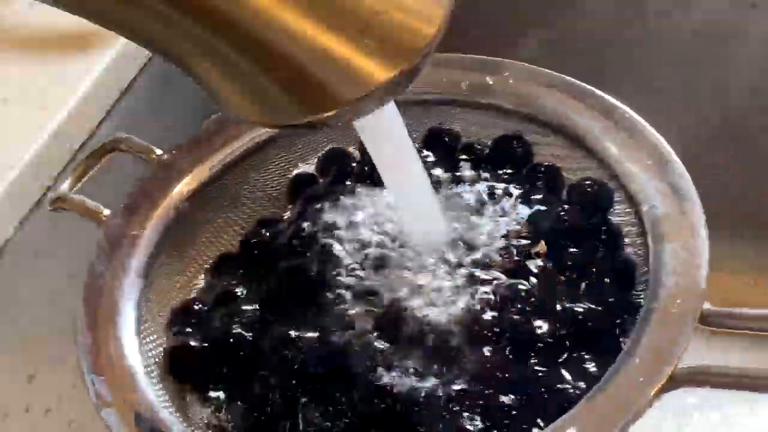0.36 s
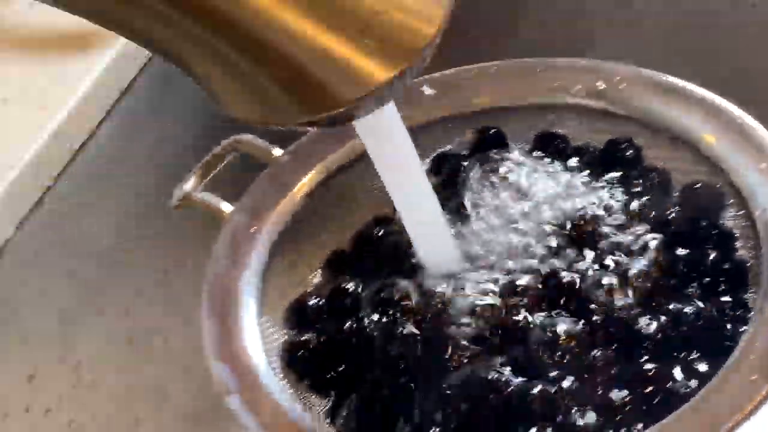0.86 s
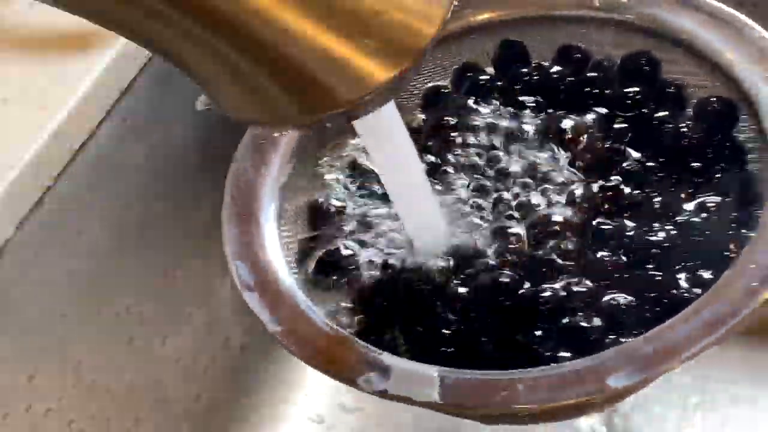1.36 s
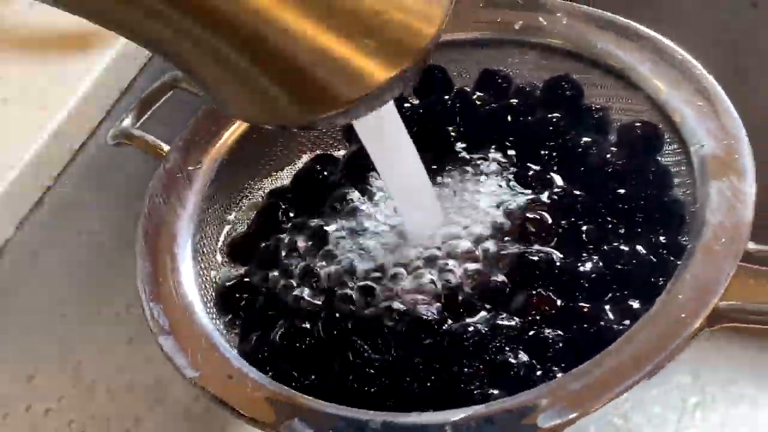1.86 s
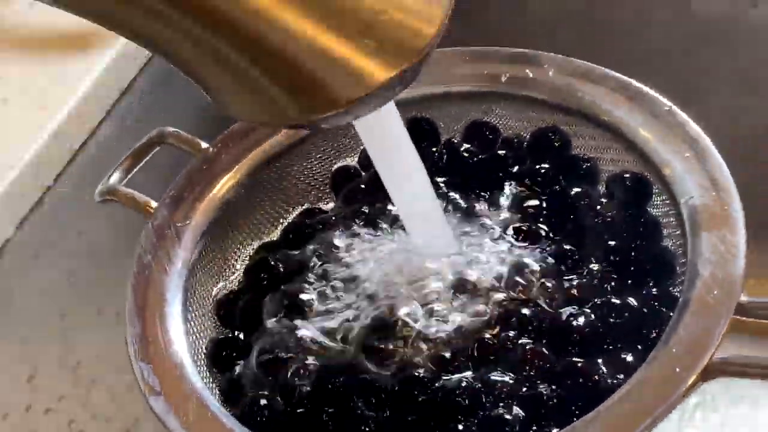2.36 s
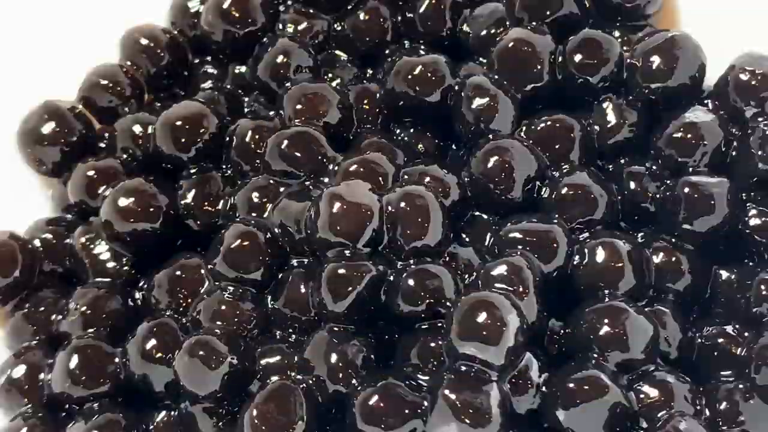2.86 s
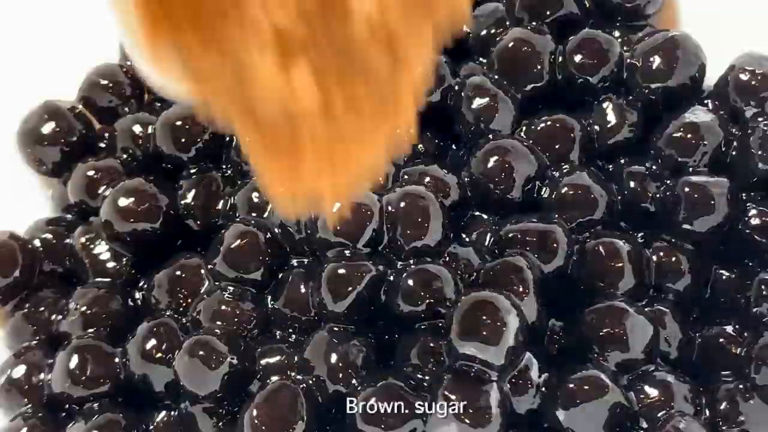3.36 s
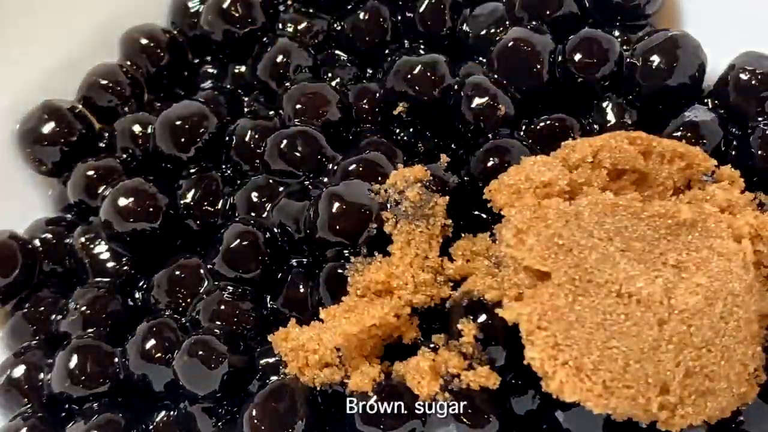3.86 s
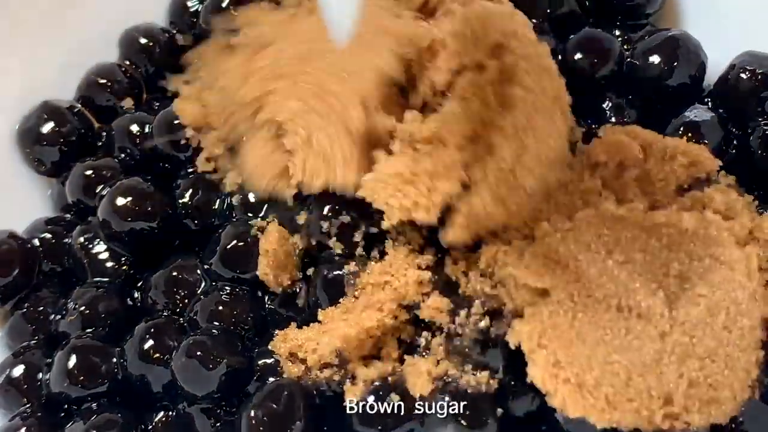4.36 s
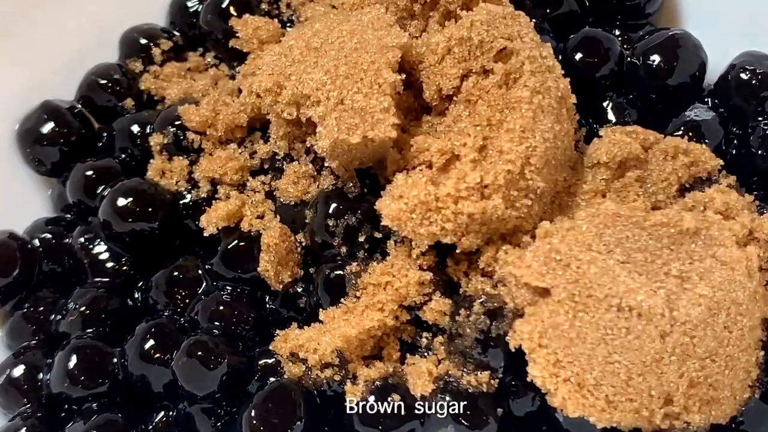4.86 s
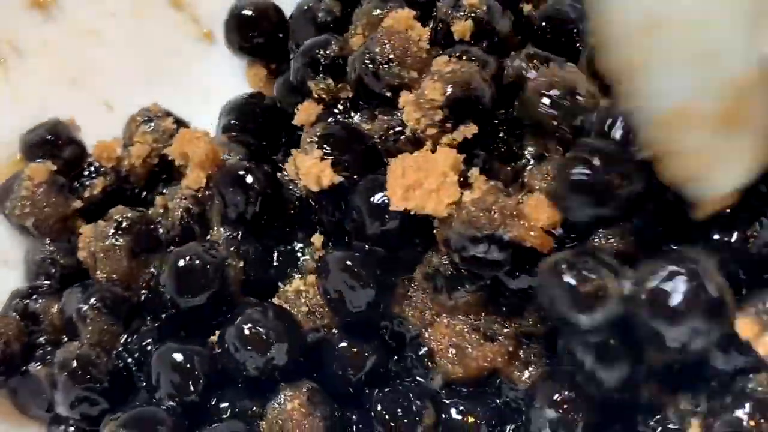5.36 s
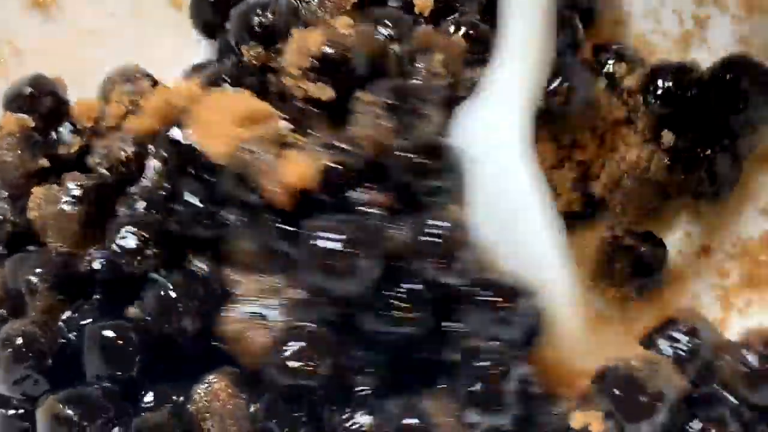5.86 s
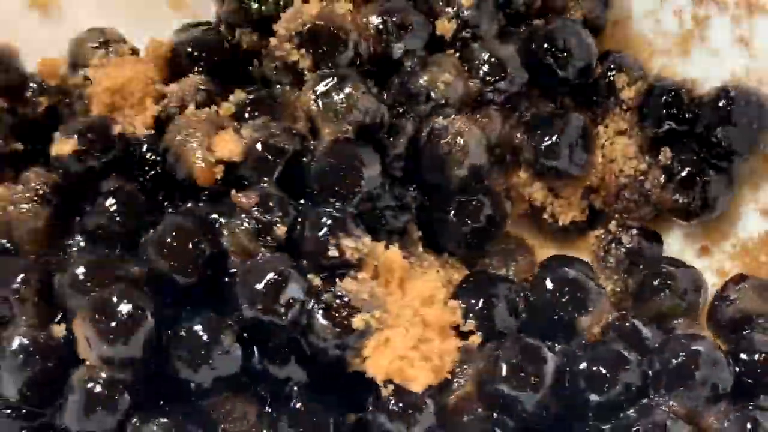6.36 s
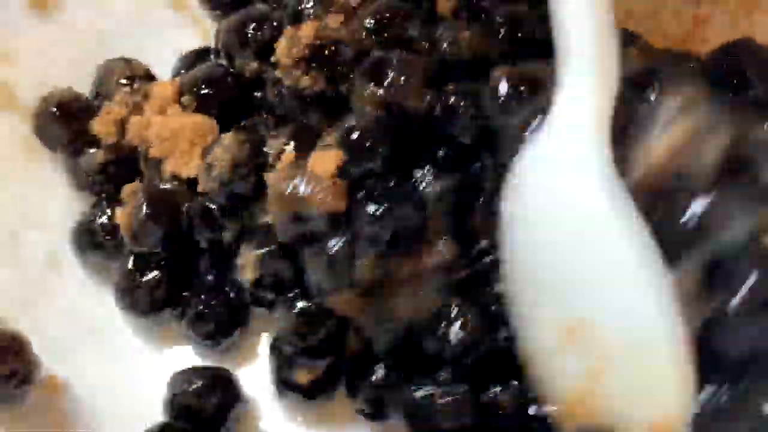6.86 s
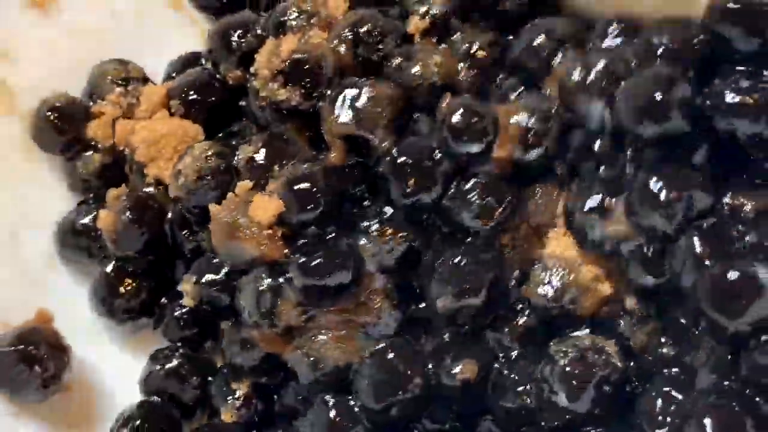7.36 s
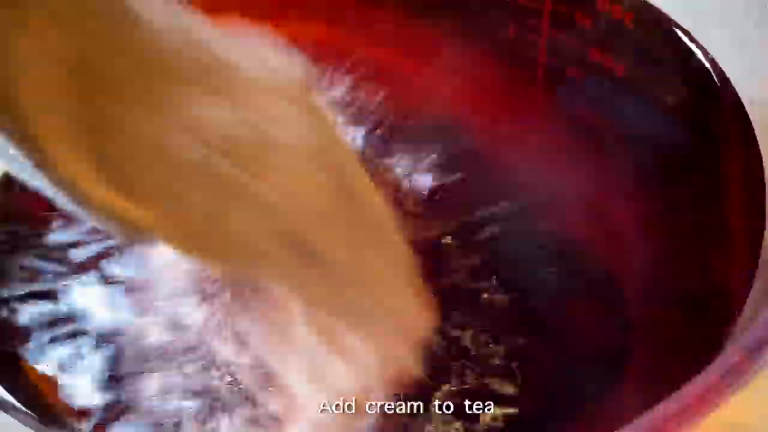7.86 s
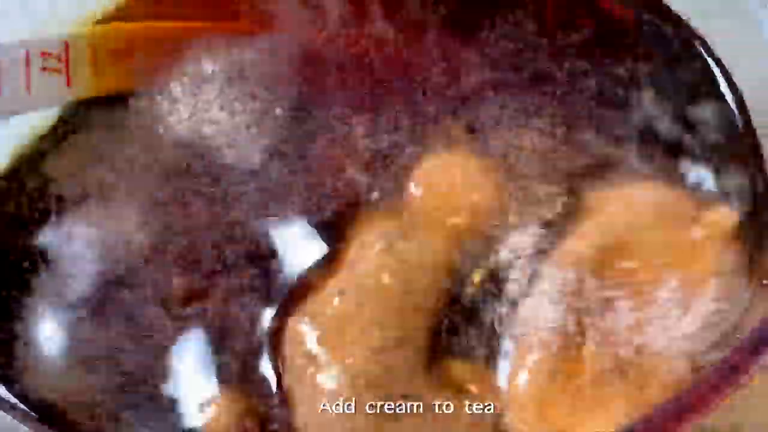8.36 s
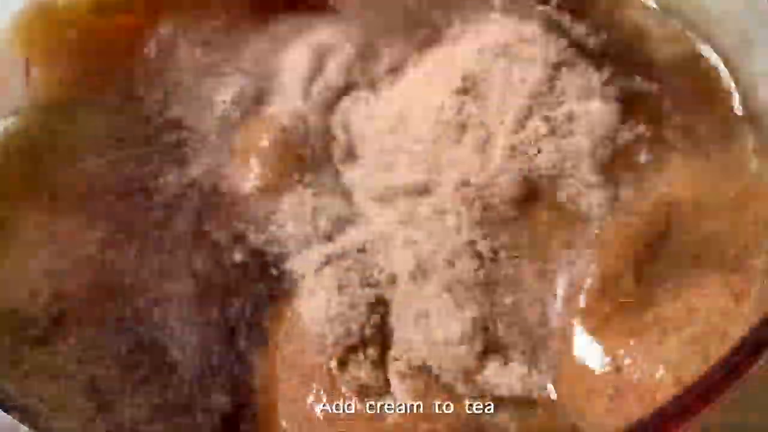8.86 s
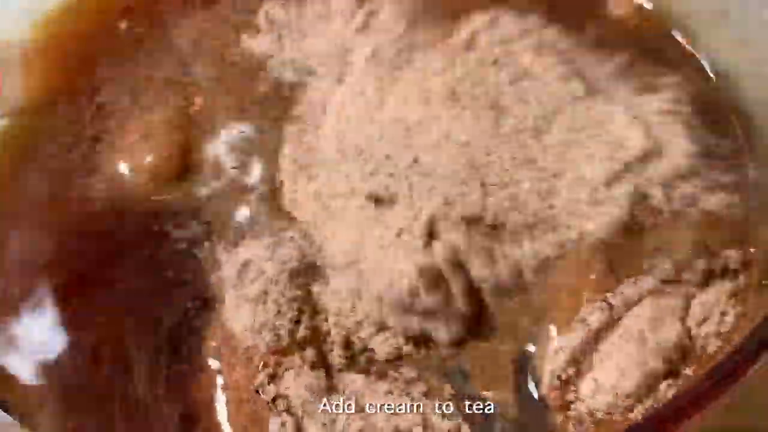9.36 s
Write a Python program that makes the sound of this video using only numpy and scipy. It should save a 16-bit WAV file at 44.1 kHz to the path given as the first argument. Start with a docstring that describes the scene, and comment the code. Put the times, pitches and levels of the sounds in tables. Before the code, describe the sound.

Tap water splashes over wet pearls in a metal sieve, then quiet, sugar slides out and a spoon stirs them with sticky crackles and one hard scrape.

```python
"""A spoon stirs sticky starch pearls in a china bowl: rubbing noise, crackles, and once a hard skid on the glaze.
Before it, a tap rinses the pearls in a sieve over a steel sink: coloured noise, and clicks through resonances.
A cut leaves a quiet kitchen of fan noise and fridge tones, where sugar slides off a spoon as fading hiss.
After a last cut to a quieter spot, powder slides into tea.
A close pair of microphones with a limiter picks it all up."""
import sys
import numpy as np
from scipy import signal
from scipy.fft import rfft, irfft, next_fast_len
from scipy.io import wavfile
from scipy.ndimage import uniform_filter1d

SR = 44100
rng = np.random.default_rng(int(sys.argv[2]) if len(sys.argv) > 2 else 0)


def output_pcm(signal):
    """Save a mono or channel-first signal as 16-bit PCM at the path in sys.argv[1].

    Samples are clipped to [-1, 1] before scaling.
    """
    pcm = np.clip(np.atleast_2d(signal).T, -1, 1) * 32767
    wavfile.write(sys.argv[1], SR, np.round(pcm).astype(np.int16))


def volts_from_db(level):
    """Convert decibel levels to linear amplitude ratios."""
    exponent = np.asarray(level, float) / 20
    return 10 ** exponent


N = 417627
TIME = np.arange(N) / SR
LONG = next_fast_len(N)
BINS = np.fft.rfftfreq(LONG, 1 / SR)
TAP_ON_S, TAP_OFF_S, TEA_CUT_S = .026, 2.428, 7.86


def evened(x):
    """Scales to an average strength (rms) of 1."""
    return x / np.sqrt(np.mean(x ** 2) + 1e-20)


def read(points, hz):
    """Reads a table between its points, on a log-frequency axis."""
    f, value = np.transpose(points)
    return np.interp(np.log(hz + 1), np.log(f + 1), value)


def shape(x, gain):
    """Filters by a gain for each frequency bin."""
    return irfft(rfft(x, LONG) * gain, LONG)[..., :N]


def colour(x, points):
    """Filters x by a table of levels over frequency, then scales it to rms 1."""
    return evened(shape(x, volts_from_db(read(points, BINS))))


# How alike the noise is on both sides: (frequency [Hz], likeness [-1 to 1])
LIKENESS = [(60, 0.94), (110, 0.89), (200, 0.87), (380, 0.17), (700, -0.074), (1290, 0.22), (2380, 0.041),
            (4400, 0.37), (8120, -0.3), (15000, 1)]
# Which side is stronger: (frequency [Hz], left minus right [dB])
LEFT_LEAN = [(160, -0.05), (270, -3.5), (450, -0.9), (1300, 1.5), (3300, 2.5), (5500, -0.8)]


def hiss(points, patchy_db):
    """Two-channel noise from random short-time spectra, with slowly drifting patches of level."""
    hz = np.fft.rfftfreq(1024, 1 / SR)
    a, b, c, d, patches = rng.standard_normal((N // 256 + 5, 513, 5)).T
    patches = uniform_filter1d(patches, size=10, axis=0)
    patches = evened(uniform_filter1d(patches, size=10, axis=1))
    same = np.clip(read(LIKENESS, hz), -1, 1)[:, None]
    left = a + 1j * b
    right = same * left + np.sqrt(1 - same ** 2) * (c + 1j * d)
    level_db = read(points, hz) + np.outer([.5, -.5], read(LEFT_LEAN, hz))
    spectra = np.array([left, right]) * volts_from_db(level_db[..., None] + patchy_db * patches)
    return evened(signal.istft(spectra, nperseg=1024, noverlap=768)[1][:, :N])


def clicks(per_s, spread_db):
    """Clicks at random moments, mostly small, a few large."""
    size = volts_from_db(spread_db * np.minimum(rng.exponential(1, N), 5)) * rng.choice([-1, 1], N)
    return size * (rng.random(N) < per_s / SR)


def resonate(x, hz, width):
    """A two-pole resonance of gain 1: it lets one pitch and its neighbours ring."""
    r = np.exp(-np.pi * width / SR)
    return signal.lfilter([1 - r, 0, r - 1], [1, -2 * r * np.cos(2 * np.pi * hz / SR), r * r], x)


def grains(per_s, spread_db, cycles, low_hz, high_hz):
    """Short tones of twelve pitches, each set off by its own random clicks, on alternate sides."""
    out = np.zeros((2, N))
    for k, hz in enumerate(np.geomspace(low_hz, high_hz, num=12)):
        u = np.arange(0, 1, hz / cycles / SR)
        tone = np.sin(2 * np.pi * cycles * u) * np.sin(np.pi * u)
        out[k % 2] += signal.oaconvolve(clicks(per_s / 12, spread_db), tone)[:N]
    # the far side hears each tone weaker and 5 samples later
    return out + .5 * np.roll(out[::-1], 5, axis=1)


def pops(rows, tail, width, noisy, wide, body, lag):
    """Each event is a click with a short noisy tail through one broad resonance, plus a wide snap and a dull body."""
    # tail: seconds at 1 Hz, falling with the root of pitch; width: share of pitch; lag: samples
    out, t = np.zeros((2, N + 9000)), np.arange(4000) / SR
    for (s, db, hz), (pan, *noise) in zip(rows, rng.standard_normal((len(rows), 4001))):
        decay = volts_from_db(-60 * t * np.sqrt(hz) / tail)
        burst = signal.unit_impulse(4000) + noisy * np.array(noise) * decay
        pop = resonate(resonate(burst, hz, width * hz), hz, width * hz)
        snap = resonate(resonate(burst, 5300, 8000), 5300, 8000)
        pop = pop / abs(pop).max() + wide * snap + body * resonate(burst, 1500, 1800)
        for ch in (0, 1):
            at = round(s * SR) + (1 - ch) * lag  # the left side hears it a little late
            out[ch, at:at + 4000] += pop * volts_from_db(db + 1.5 * pan * (.5 - ch))
    return out[:, :N]


STOP_S, FADE_BEND = 0.0062, 1.5


def envelope(start, length, rise, fade_db):
    """Quick rise, a fade that steepens, a quick stop; also returns the progress 0-1."""
    u = np.clip((TIME - start) / length, 0, 1)
    swell = np.clip((TIME - start) / rise, 0, 1)
    stop = np.clip(1 + (start + length - TIME) / STOP_S, 0, 1)
    return (swell * stop) ** 2 * volts_from_db(fade_db * u ** FADE_BEND), u


# Dull colour of wet things rubbing: (frequency [Hz], relative level [dB per Hz])
WET_COLOUR = [(500, -25), (900, -0.5), (1400, -8), (2700, -1.5), (4500, -7), (10800, -24.5), (16000, -8.5)]


def slide(rows, rise, dry, wet, bright):
    """Friction noise, each slide a blend of a bright, dry colour and the dull one of wet things."""
    power = np.array([(volts_from_db(db) * envelope(s, length, rise, fade_db)[0]) ** 2
                      for s, length, db, fade_db, _ in rows])
    dull = np.clip(np.array(rows)[:, -1], 0, 1)
    bright_part = np.sqrt((1 - dull) @ power) * colour(dry, bright)
    dull_part = np.sqrt(dull @ power) * colour(wet, WET_COLOUR)
    return bright_part + dull_part


# How long the kitchen's echo takes to fall by 60 dB: (frequency [Hz], time [s])
ECHO_TIMES = [(300, 0.17), (1500, .35), (5000, 0.45), (14000, 0.13)]


def room(x):
    """The kitchen's echo: sparse taps of random sign, each band dying at its own speed."""
    taps = np.zeros((2, SR // 2))
    at = np.arange(200, SR // 2 - 20, 20)
    at = at + rng.integers(0, 20, (2, len(at)))
    np.put_along_axis(taps, at, rng.choice([-1., 1.], at.shape), 1)
    hz, t, z = signal.stft(taps, SR, nperseg=256)
    decay = volts_from_db(-60 * t / read(ECHO_TIMES, hz)[:, None])
    tail = signal.istft(z * decay, SR, nperseg=256)[1]
    return signal.fftconvolve(x, tail / np.linalg.norm(tail[0]), axes=1)[:, :N]


# Fan noise in the kitchen: (frequency [Hz], relative level [dB per Hz])
FAN_COLOUR = [(15, -42), (25, -16), (63, -3), (286, -12), (318, -1.5), (363, -3), (525, -17.5),
              (584, -13.5), (846, -20.5), (1190, -21), (1400, -33), (1600, -36), (14000, -63)]
# Noise at the quieter spot of the tea: (frequency [Hz], relative level [dB per Hz])
TEA_COLOUR = [(15, -36), (25, -6), (129, -5.5), (286, -9.5), (403, -1), (511, -15.5), (616, -16),
              (1360, -26.5), (2080, -43), (14000, -56)]
# Hum of the fridge: (frequency [Hz], level [dB rms])
FRIDGE_TONES = [(60, -60), (600, -75), (1186, -74)]
FAN_DB, TEA_SPOT_DB = -53.5, -55


def kitchen():
    """Fan noise with fridge tones, which waver from added narrow noise; the last shot stands in a quieter spot."""
    tones = np.zeros(N)
    for hz, db in FRIDGE_TONES:
        waver = evened(resonate(rng.standard_normal(N), hz, 3.0))
        tones += volts_from_db(db) * evened(np.sin(2 * np.pi * hz * TIME) + .5 * waver)
    first = volts_from_db(FAN_DB) * hiss(FAN_COLOUR, patchy_db=.5) + tones
    last = volts_from_db(TEA_SPOT_DB) * hiss(TEA_COLOUR, patchy_db=-2.1)
    return np.where(TIME < TEA_CUT_S, first * (TIME > TAP_ON_S), last)


# Colour of the water spray: (frequency [Hz], relative level [dB per Hz])
SPRAY_COLOUR = [(24, -25.5), (40, -7), (170, 3.5), (538, -21), (1040, -4), (1700, -10), (8790, -9.5),
                (10400, -7), (11800, -12.5), (12700, -9.5), (14000, -17.5)]
# Steel floor of the sink: (frequency [Hz], width [Hz], relative level [dB])
SINK_MODES = [(60, 6.1, -12), (90.3, 51, -7), (125, 4.8, 6), (179.5, 1.8, 11), (244, 35, -14.5),
              (266, 10, -15.5)]
# Air pockets among the pearls: (frequency [Hz], width [Hz], relative level [dB])
SIEVE_POCKETS = [(630, 41, -7), (740, 30, -3), (1050, 57, 2.5), (1358, 54, -2.5)]
# Water running through the moving sieve onto the sink: (time [s], level [dB])
RUNOFF_LEVEL = [(.03, -44), (.2, -42), (.45, -42), (.72, -45.5), (1.15, -49.5), (1.5, -41.5), (1.75, -44),
                (1.9, -39.5), (2.15, -56), (2.42, -39)]
# Large splashes: (time [s], peak of the pitched part [dB], frequency [Hz])
BIG_SPLASHES = [(0.1366, -30.5, 13600), (0.193, -23, 10700), (0.2836, -28.5, 12900), (0.932, -29, 3270),
                (1.69, -29.5, 9900), (1.7569, -26.5, 10500), (2.1824, -29.5, 9400)]
# Slaps of water on the sink, mostly low, the last a soft thud just after the cut:
# (time [s], peak [dB], frequency [Hz])
SINK_SLAPS = [(0.142, -25.5, 181), (0.19, -28, 170.7), (0.804, -31, 184), (1.194, -30, 176),
              (1.458, -33.5, 190.5), (2.397, -23, 1050), (2.454, -36, 160)]
SPRAY_DB, FIRST_GUSH_DB, GUSH_PEAK_S, GUSH_WIDTH_S = -38.5, 4.5, .35, 0.38  # the spray is stronger at first
RUMBLE_DB, RUMBLE_HZ, RUMBLE_WIDTH_HZ = -44, 120, 180  # the first gush thumps the whole sink
# the gurgle follows a share of the runoff; its level holds at time 0 and full runoff
GURGLE_DB, GURGLE_FOLLOWS, GURGLE_GROWS_DB_PER_S = -46.5, .3, 2.13


def tap():
    """Spray and fizz on the pearls, gurgling pockets in the sieve, lumps of water drumming the sink."""
    fizz = colour(grains(2500, 5.5, 2.1, 2450, 14000), SPRAY_COLOUR)
    gush = np.exp(-((TIME - GUSH_PEAK_S) / GUSH_WIDTH_S) ** 2)
    spray = evened(hiss(SPRAY_COLOUR, patchy_db=2.0) + .5 * fizz)
    spray *= volts_from_db(SPRAY_DB + FIRST_GUSH_DB * gush)

    runoff_db = np.interp(TIME, *np.transpose(RUNOFF_LEVEL))
    lumps = clicks(250, 3.6)
    drum = evened(sum(volts_from_db(db) * resonate(lumps, hz, w) for hz, w, db in SINK_MODES))
    thumps = resonate(clicks(60, 2.1), RUMBLE_HZ, RUMBLE_WIDTH_HZ)
    thumps = evened(resonate(thumps, RUMBLE_HZ, RUMBLE_WIDTH_HZ))
    drum = drum * volts_from_db(runoff_db) + volts_from_db(RUMBLE_DB) * gush * thumps

    bubbles = np.array([clicks(1400, 4.0), clicks(1300, 1.9)])
    bubbles = bubbles + 0.1 * bubbles[::-1]  # each side leaks a little into the other
    gurgle = evened(sum(volts_from_db(db) * resonate(bubbles, hz, w) for hz, w, db in SIEVE_POCKETS))
    follow_db = GURGLE_FOLLOWS * (runoff_db - max(runoff_db))
    gurgle *= volts_from_db(GURGLE_DB + follow_db + GURGLE_GROWS_DB_PER_S * TIME)

    splashes = pops(BIG_SPLASHES, 4.3, 0.42, 1.0, 0.88, .3, lag=0)
    slaps = pops(SINK_SLAPS, 0.32, 0.23, 0.057, 0, 0, lag=0)
    running = (TIME > TAP_ON_S) & (TIME < TAP_OFF_S)
    return running * (spray + drum + gurgle + splashes) + slaps


# Sugar, later powder, sliding off: (start [s], length [s], level [dB], fade [dB], dullness [0-1])
POUR_SLIDES = [(2.97, 0.28, -79, -1, .02), (3.192, 0.027, -56.5, -13, 0.14), (3.26, 0.12, -41.5, 1.5, 0),
               (4.215, 0.18, -61, -23, 0.01), (4.645, 0.14, -68.5, -15, 1), (7.855, 0.097, -70, -19, 0.5),
               (8.415, .1, -67.5, -21, 0.5), (8.77, 0.1, -72.5, -12, 1), (9.03, 0.14, -68, -9, 0.52)]
# Bright colour of dry grains: (frequency [Hz], relative level [dB per Hz])
GRAIN_COLOUR = [(2000, -49), (2700, -46), (4100, -11), (6000, -3.5), (10800, 4.5), (16000, -8)]


def pour():
    """Sliding grains: noise with many tiny tones that swells over 20 ms, changes level and stops."""
    trickle = rng.standard_normal((2, N)) + 0.1 * grains(3300, 2.5, 2.3, 2700, 14000)
    return slide(POUR_SLIDES, .02, trickle, trickle[::-1], GRAIN_COLOUR)


# Sticky pearls letting go and spoon ticks: (time [s], peak of the pitched part [dB], frequency [Hz])
STICKY_POPS = [(5.4281, -37, 12800), (5.4283, -25.5, 2840), (5.4374, -28, 12700), (5.4474, -25, 9900),
               (2.5336, -31, 1650), (6.3031, -20.5, 13600), (6.3084, -28, 12600), (6.3214, -13, 13330),
               (6.3264, -16.5, 10500), (6.3714, -17, 13240), (6.4183, -23, 3690), (6.4185, -24.5, 9100),
               (7.2994, -21, 7360), (7.3044, -25, 7400), (4.8818, -44.5, 1280), (4.9277, -37, 11300),
               (4.938, -44, 11000), (4.964, -52, 9000), (4.983, -39, 12800), (5.006, -41, 3600),
               (5.0229, -36, 3260), (5.049, -40, 11000), (5.309, -50, 11300), (5.324, -51, 12000),
               (5.63, -35.5, 7000), (5.683, -51, 4170), (5.0973, -40.5, 12600), (5.2983, -52, 13000),
               (5.8386, -36, 1770), (5.8601, -31.5, 3780), (5.905, -34.5, 4330), (5.9379, -39, 4630),
               (5.9863, -44.5, 2590), (6.187, -46.5, 7800), (6.5031, -31.5, 7760), (6.5505, -23.5, 10300),
               (6.5614, -34, 3030), (6.5794, -28, 4630), (6.6248, -29, 10400), (6.6862, -34, 4400),
               (6.656, -42, 1990), (6.679, -36, 3000), (6.7471, -38.5, 3500), (6.785, -40.5, 2530),
               (6.7945, -25.5, 10000), (6.8648, -29, 9600), (6.8862, -32.5, 12400), (7.011, -43.5, 4220),
               (7.4056, -27.5, 3150), (7.4405, -30.5, 12700), (7.4709, -32, 10460), (7.5707, -35, 4110),
               (7.9049, -49.5, 2590)]


def smack():
    """Pearls letting go and spoon ticks: short pops with a strong snap and body."""
    return pops(STICKY_POPS, tail=.5, width=.3, noisy=0.43, wide=2.2, body=2.5, lag=10)


# Colour of the scrape itself: (frequency [Hz], relative level [dB per Hz])
SCRAPE_COLOUR = [(400, -51), (1000, -26), (1400, -31.5), (2400, -20.5), (3300, 1), (4200, -18),
                 (5100, -28.5), (6100, 1.5), (8300, -2.5), (9700, 2.5), (13800, -8), (16000, -15)]
# Ringing tones of the bowl: (frequency [Hz], relative level [dB], time to fall by 60 dB [s])
BOWL_MODES = [(1893, -34, .8), (2800, -8, .025), (3030, -7, .025), (3170, -9, .03), (3380, -8, .03),
              (3440, -5, .035), (3545, 1, .04), (4200, -9, .025), (4700, -13, .025), (5900, -10, .02),
              (6300, -8, .02), (7070, -9, .02), (9400, -8, .02), (10145, -8, .02)]
# The spoon strikes the bowl: (time [s], strength of the blow before the ring [dB])
BOWL_KNOCKS = [(5.428, -24.5), (5.438, -22.5), (5.447, -23), (7.2, 7.5)]
# How far the left side leads: (frequency [Hz], phase [radians])
LEFT_LEAD = [(0, 2.4), (3500, 0.59), (6000, 1), (10000, 0.71), (14000, 0.97)]
SKID_S, SKID_LENGTH_S, SKID_RISE_S, SKID_FADE_DB = 7.2, .048, 0.0074, -6
CHATTER_GAIN_DB, RING_GAIN_DB, RASP_GAIN_DB = -13, 2.5, 6.0
SLIPS_PER_S, SLIPS_GAIN_PER_S = 620, 600  # average rate at the start, and its rise by the end


def skid():
    """The spoon lands, then its edge sticks and slips ever faster over the glaze: a rising squeal. The bowl rings."""
    level, progress = envelope(SKID_S, SKID_LENGTH_S, SKID_RISE_S, SKID_FADE_DB)
    unsteady = 1 + .25 * uniform_filter1d(rng.standard_normal(N), size=60)
    rate = (SLIPS_PER_S + SLIPS_GAIN_PER_S * progress ** .7) * unsteady
    turns = np.cumsum(rate) / SR
    slips = sum(np.cos(2 * np.pi * (k * turns + rng.random())) for k in range(1, 7))
    grit = evened(clicks(12000, 1.5)) * (.6 + np.exp(-(turns % 1) / 0.23))  # grains crushed at each slip
    chatter = (.4 * slips + grit) * level * volts_from_db(CHATTER_GAIN_DB)
    rasp = colour(chatter, SCRAPE_COLOUR) * np.std(chatter)
    knocks = sum(volts_from_db(db) * signal.unit_impulse(N, round(s * SR)) for s, db in BOWL_KNOCKS)
    t = TIME[:SR]
    modes = sum(volts_from_db(db - 60 * t / t60) * np.sin(2 * np.pi * hz * t) for hz, db, t60 in BOWL_MODES)
    ring = signal.oaconvolve(chatter + knocks, modes / np.linalg.norm(modes))[:N]
    right = volts_from_db(RING_GAIN_DB) * ring + volts_from_db(RASP_GAIN_DB) * rasp
    lead = np.exp(1j * np.interp(BINS, *np.transpose(LEFT_LEAD)))
    return np.array([shape(right, lead) * volts_from_db(1.1), right])


# The spoon dragging through the pearls: (start [s], length [s], level [dB], fade [dB], dullness [0-1])
SPOON_STROKES = [(4.877, 0.032, -63, -9, 1), (4.928, .14, -52, -11, 0.45), (5.09, 0.35, -59.5, -39, 0.5),
                 (5.428, 0.28, -50, -10, 0.45), (5.54, 0.16, -47, -4, 0.72), (5.69, .12, -63.5, 10, 0.36),
                 (5.81, 0.16, -52.5, -7.5, 0.47), (5.98, 0.13, -50.5, -14, 0.16), (6.1, 0.11, -70, -6, 0.4),
                 (6.303, 0.22, -32, -29.5, 0), (6.31, 0.27, -52, -5.5, 0.5), (6.54, 0.35, -48, -12.5, 0.6),
                 (6.92, 0.21, -70, -4.5, 0.4), (7.255, 0.1, -27.5, -22, 0.74),
                 (7.37, .26, -40.5, -16.5, 0.39), (7.63, 0.12, -72, -8.5, 1)]
# Bright colour of dry rubbing: (frequency [Hz], relative level [dB per Hz])
DRY_COLOUR = [(500, -28), (2200, -29), (3900, -10), (7300, -2), (8600, -10), (10500, 8), (16000, -15.5)]
STIR_RISE_S, SURGE_DB = 0.0022, 3.2
# each crackle falls by 60 dB in CRACKLE_S; the gain is set before the rubbing is coloured
CRACKLES_PER_S, CRACKLE_S, CRACKLE_GAIN_DB, CRACKLE_SPREAD_DB = 160, .002, 9, 3.5


def stir():
    """Rubbing noise in uneven surges; sugar crackles, pearls come unstuck, and air pockets in the syrup squelch."""
    surges = volts_from_db(SURGE_DB * evened(uniform_filter1d(rng.standard_normal(N), size=250)))
    rub = surges * rng.standard_normal((2, N))
    snap = rng.standard_normal(400) * volts_from_db(-60 * TIME[:400] / CRACKLE_S)
    unstuck = signal.oaconvolve(clicks(CRACKLES_PER_S, CRACKLE_SPREAD_DB), snap)[:N]
    unstuck = volts_from_db(CRACKLE_GAIN_DB) * np.array([np.roll(unstuck, 10), unstuck])  # left 10 samples late
    crackle = grains(1200, 5.9, 1.4, 2000, 14000)
    squelch = grains(1500, 3.0, 9, 1500, 4500)
    dry_rub = rub + unstuck + .6 * crackle
    wet_rub = rub[::-1] + unstuck + .5 * squelch
    return slide(SPOON_STROKES, STIR_RISE_S, dry_rub, wet_rub, DRY_COLOUR)


ROOM_DB, SMACK_ROOM_DB = -15, -14


def scene():
    """Sink first, then the bowl and the tea in the kitchen's echo; the last cut ends the bowl's direct ring."""
    smacks = smack()
    near = pour() + stir() + skid() * (TIME < TEA_CUT_S)
    echo = room(volts_from_db(ROOM_DB) * near + volts_from_db(SMACK_ROOM_DB) * smacks)
    return tap() + kitchen() + near + smacks + echo


def roll_off(x):
    """The treble ends steeply here."""
    return signal.sosfilt(signal.butter(12, 16400, fs=SR, output="sos"), x)


# Overall tone of the sound: (frequency [Hz], gain [dB])
OVERALL_TONE = [(20, -6.5), (11000, 1.5), (11400, -3), (11800, -26), (12300, 4.5), (14200, 11),
                (14800, -21.5), (15700, -17.5), (16400, -35), (16800, -72)]


def record(dry):
    """A limiter turns loud moments down and recovers slowly, ducking what follows; then the overall tone is set."""
    power_db = 10 * np.log10(abs(uniform_filter1d((dry ** 2).mean(0), size=300)) + 1e-12)
    fall = TIME * 39.0  # the held level falls this many dB a second
    held_db = np.maximum.accumulate(power_db + fall) - fall
    over_db = np.maximum(held_db + 25.5, 0)  # excess above -25.5 dB
    ducked = dry / volts_from_db(0.47 * uniform_filter1d(over_db, size=100))
    heard = shape(ducked, volts_from_db(read(OVERALL_TONE, BINS)))
    return roll_off(np.clip(heard, -1, 1))


dry = scene()
out = record(dry)
output_pcm(out)
```